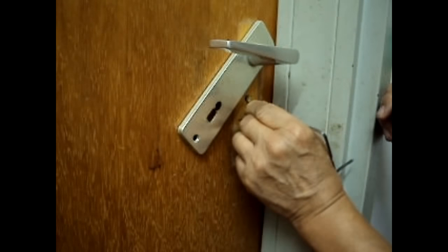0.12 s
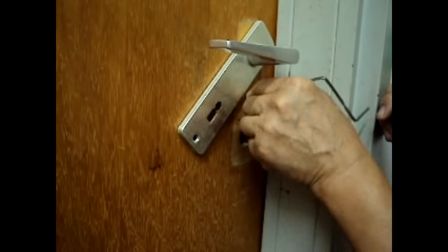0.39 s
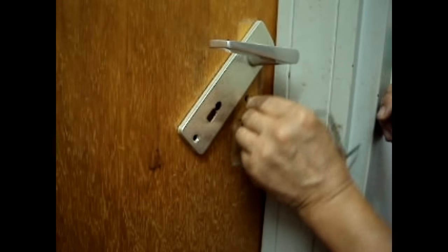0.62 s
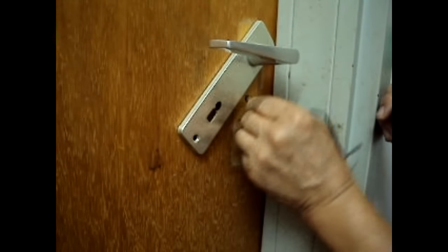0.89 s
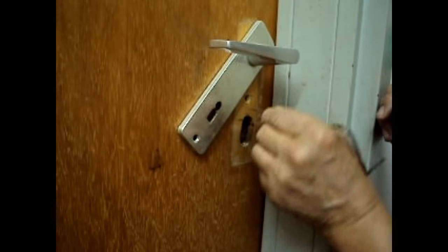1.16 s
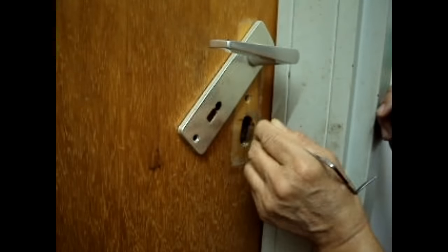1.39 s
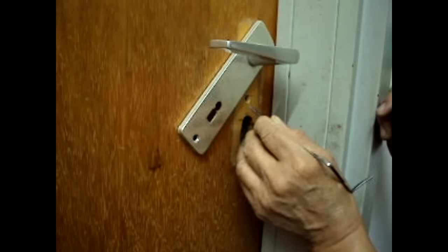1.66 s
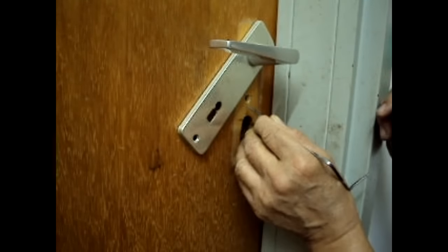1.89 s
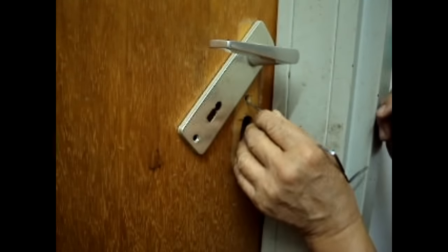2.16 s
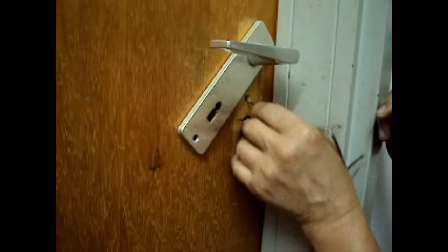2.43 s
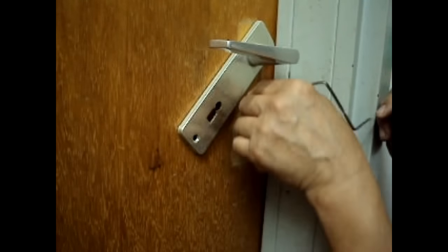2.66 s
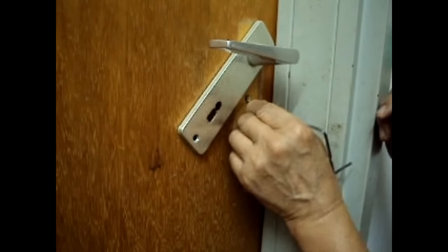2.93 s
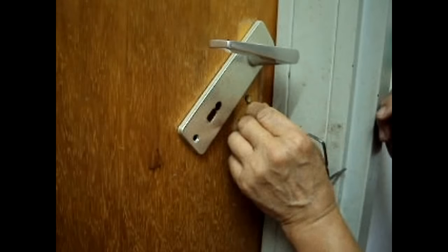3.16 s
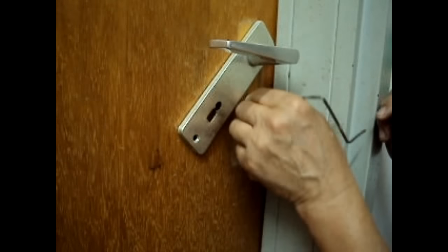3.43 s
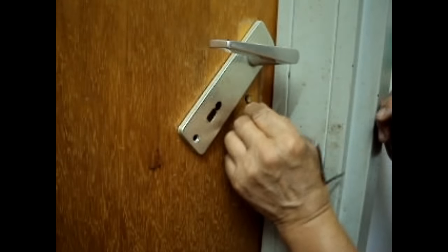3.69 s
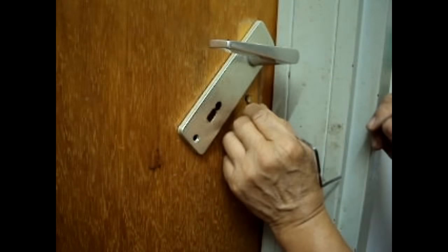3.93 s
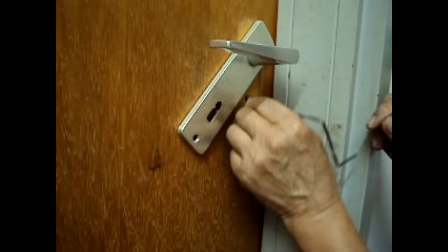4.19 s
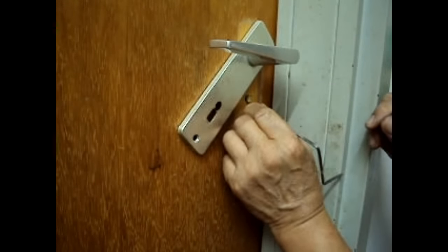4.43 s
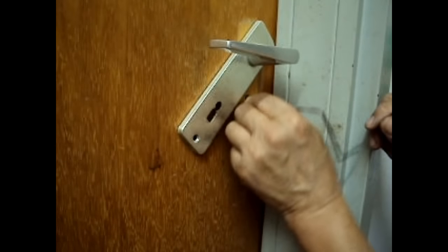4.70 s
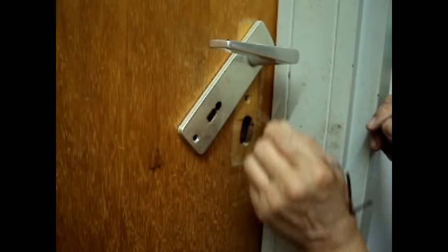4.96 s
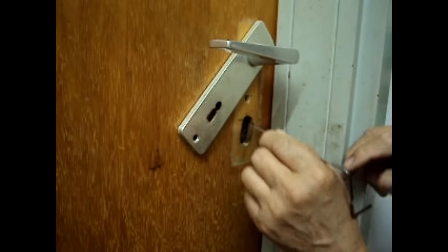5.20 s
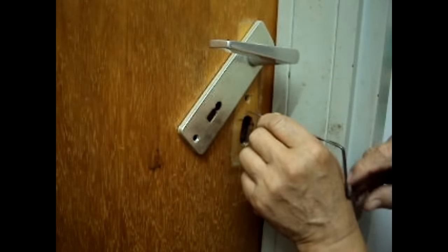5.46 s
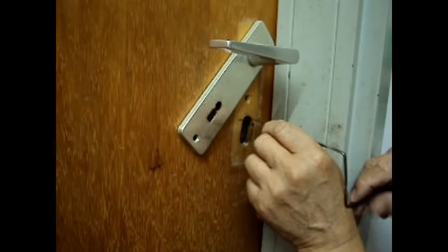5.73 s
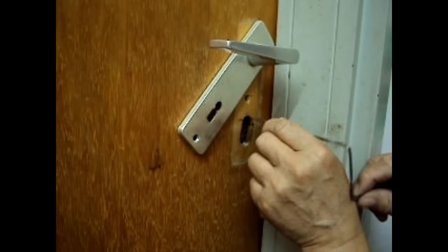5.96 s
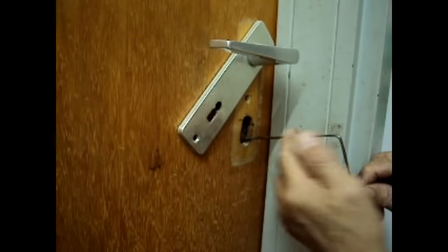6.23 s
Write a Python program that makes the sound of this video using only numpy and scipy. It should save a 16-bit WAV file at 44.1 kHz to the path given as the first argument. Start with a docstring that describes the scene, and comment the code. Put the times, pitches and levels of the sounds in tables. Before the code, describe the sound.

A small indoor room, heard closely through a crude microphone: low rumble and dull hiss with a coarse, grainy edge, and a metallic false brightness on every sound. At 0 s a deep, wavering boom and a soft door tap. From 0.5 to 0.9 s several light woody taps cluster, strongest about 0.65 s. At 1.15-1.2 s a quick, sharp metallic clatter hits the lock case, followed by a low thud. Then quiet, the background thinning, with one barely audible tick near 2.2 s. From 2.4 to 3.15 s the probe scrapes, strongest near 2.9 s, amid taps, low booms and a loose plate's rattle, which trails to 3.3 s. Faint isolated ticks at 3.6, 3.75, 4.25 and 4.75 s. At 5.04-5.08 s comes the loudest event, a rapid volley of hard snaps in metal and wood, with short room reverberation and a boom at 5.17 s. Fuller room noise continues alone to about 6.35 s.

```python
"""A thin steel probe works inside a hole in a wooden door, against a lock case, in a small room.
A low boom and a tap open; taps lead to a burst near 1.2 s, as impacts excite decaying modes and the room.
From 2.4 to 3.15 s a scrape excites the modes by dense slips, amid taps and rattles of a loose cover plate.
Sparse faint taps lead to hard snaps near 5.05 s and a boom of rumble and wavering hum; noise lies beneath all.
Slow, coarse sampling joined by straight lines mirrors the whole sound into the treble."""
import sys
import numpy as np
from scipy import signal
from scipy.fft import rfft, irfft, next_fast_len
from scipy.io import wavfile

SR = 44100
rng = np.random.default_rng(int(sys.argv[2]) if len(sys.argv) > 2 else 0)


def linear_from_db(decibels):
    """Turn decibels (scalar or array-like) into linear amplitude factors; 0 gives 1."""
    return 10 ** (np.asarray(decibels, float) / 20)


def to_wav(sig):
    """Store sig (one row per channel, or 1-D mono) as 16-bit WAV at the path in sys.argv[1].

    Samples outside -1..1 are clipped; the rate is SR.
    """
    pcm = np.clip(np.atleast_2d(sig), -1, 1) * 32767
    pcm = np.round(pcm).astype(np.int16)
    wavfile.write(sys.argv[1], SR, pcm.T)  # frames by channels


N = 280035
SAMPLE_STEP = 4  # the slow sampling keeps one sample in four

# Contacts of the probe in the bore: (time [s], lock case level [dB], panel level [dB],
# wood level [dB], steel tip level [dB])
BORE_CONTACTS = [(0.002, -57, -38, -49.5, -66.5), (0.51, -58.5, -43.5, -43, -91),
                 (0.583, -74, -43, -70.5, -85), (0.6, -48.5, -50, -50, -85), (0.636, -51.5, -41, -55, -73),
                 (0.647, -49, -35, -43.5, -64), (0.658, -46.5, -30, -43, -67.5),
                 (0.683, -63.5, -44.5, -48, -83), (0.81, -70, -47.5, -54, -88),
                 (0.893, -72, -48, -64.5, -85), (1.143, -55.5, -47, -55.5, -74),
                 (1.157, -47.5, -34.5, -66, -84), (1.17, -31.5, -31, -40, -53.5),
                 (1.182, -27, -36, -38.5, -47), (1.187, -32, -67, -53.5, -42),
                 (1.195, -43.5, -42.5, -38, -40.5), (2.166, -80, -52, -71.5, -83),
                 (2.694, -50, -44, -49.5, -63), (2.752, -57.5, -44, -50, -79),
                 (2.818, -63, -48, -54.5, -85), (2.881, -40.5, -48.5, -46.5, -60),
                 (2.89, -45, -41, -41, -73), (2.906, -37.5, -33, -41, -52.5), (2.917, -53, -33.5, -58, -69),
                 (3.055, -46, -51.5, -60, -59), (3.069, -55, -76, -46.5, -72),
                 (3.176, -66.5, -79.5, -51, -103), (3.605, -50.5, -55.5, -53.5, -71),
                 (3.753, -66, -46.5, -55.5, -69), (3.77, -57.5, -59, -53.5, -80.5),
                 (4.225, -58.5, -66, -73, -72), (4.234, -70.5, -63.5, -55, -77),
                 (4.291, -64, -78, -77, -68), (4.737, -60.5, -79, -60.5, -67.5),
                 (4.747, -56.5, -85, -62.5, -78.5), (4.854, -68, -56.5, -67.5, -93),
                 (5.009, -56, -49.5, -78, -72), (5.039, -35.5, -28.5, -32.5, -38),
                 (5.047, -21, -32.5, -23.5, -30.5), (5.056, -25, -28, -19.5, -22.5),
                 (5.064, -20, -28.5, -32.5, -31), (5.073, -25, -32, -24, -40.5),
                 (5.082, -29.5, -28.5, -21, -38.5)]
# Knocks of the probe on the loose plate: (time [s], plate level [dB])
PLATE_KNOCKS = [(2.752, -45.5), (3.055, -48), (3.237, -45.5), (3.249, -45), (3.261, -49), (3.283, -53)]


def taps():
    """Superposition: every contact adds its own direct sound and its own reverberation."""
    plate_under_case_db = 7  # the cover plate is screwed to the lock and rings along with it
    case_under_plate_db, wood_under_plate_db = 9.5, 10.5
    contacts = []
    for s, case, panel, wood, tip in BORE_CONTACTS:
        contacts.append((s, case, panel, wood, case - plate_under_case_db, tip))
    for s, plate in PLATE_KNOCKS:
        door = plate - wood_under_plate_db  # panel and wood alike
        contacts.append((s, plate - case_under_plate_db, door, door, plate, -np.inf))  # tip silent
    out = np.zeros(N + 2 * SR)
    for s, *levels in contacts:
        start = round(s * SR)
        near = strike(levels)
        far = reverb(near)
        out[start:start + len(near)] += near
        out[start:start + len(far)] += far
    return out[:N]


# Natural modes of each part: (frequency [Hz], relative level [dB], decay time t60 [s])
CASE_MODES = [(1057.6, 5, 0.045), (1115, -13.5, 0.042), (1192, 2, 0.042), (1275, -3, 0.055),
              (1384, 0.5, 0.017)]
PANEL_MODES = [(164.5, -5.5, 0.12), (215, -7, 0.23)]
WOOD_MODES = [(340.6, -5, 0.088), (391.8, -4.5, 0.085), (457, -6, 0.021), (540.5, 3.5, 0.042),
              (628.5, 3.5, 0.039), (723, -1.5, 0.046), (892, -4, 0.024)]
PLATE_MODES = [(837, 1.5, 0.027), (1596, -17, 0.041)]
STEEL_MODES = [(1550, 0, .006), (1950, -1, .008), (2400, -4, .005), (2800, -5, .006), (3200, -6, .009),
               (3600, -10, .005), (4200, -13, .004), (4600, -13, .005), (5000, -11, .006),
               (5350, -11, .006)]


def strike(levels):
    """Forced vibration: a blow and a brief chatter of the springy tip drive each part's modes."""
    settle_s = 0.002  # the tip presses home over a moment, so each blow swells in
    crack_db, crack_t60_s = 7.5, 0.012  # the tip's dry crack, over its ringing
    parts = (CASE_MODES, PANEL_MODES, WOOD_MODES, PLATE_MODES, STEEL_MODES)
    # Chatter against the blow, part by part
    chatter = (0.06, 0.059, 0.027, 0.15, 0.035)
    t = np.arange(SR // 30) / SR
    near = 0
    for db, modes, size in zip(levels, parts, chatter):
        force = size * np.exp(-t / 0.008) * rng.standard_normal(len(t))
        force[0] = 1  # the blow
        struck = signal.fftconvolve(ring(modes), force)
        struck = struck * (1 - np.exp(-np.arange(len(struck)) / SR / settle_s))
        near = near + linear_from_db(db) * struck / np.std(struck[:SR // 50])  # level over the first 20 ms
    crack = unit(np.diff(rng.standard_normal(len(t) + 1)))
    near[:len(t)] += linear_from_db(levels[-1] + crack_db - 60 * t / crack_t60_s) * crack
    return near


def ring(modes, rise_cycles=0.79):
    """Modal superposition: decaying sines at new strengths and phases, rms 1 over the first 20 ms."""
    scatter_db = 2  # each contact finds the modes at slightly new strengths
    t = np.arange(SR // 3) / SR
    hz, db, t60 = np.transpose(modes)[:, :, None]
    db = db + scatter_db * rng.standard_normal(db.shape)
    rise = 1 - np.exp(-t * hz / rise_cycles)  # a soft contact: each mode builds up over about a cycle
    phase = 2 * np.pi * rng.random(db.shape)
    decay = linear_from_db(db - 60 * t / t60)
    sound = np.sum(decay * np.sin(2 * np.pi * hz * t + phase) * rise, axis=0)
    return sound / np.std(sound[:SR // 50])


# Answer of the room: (frequency [Hz], decay time t60 [s], reverberant against direct energy [dB])
ROOM_ANSWER = [(147, 0.44, -13.5), (404.4, 0.47, -2.5), (1455, 0.36, -4.5), (3030, 0.36, -4.5),
               (5060, 0.26, -4)]


def reverb(x):
    """Diffuse decay: convolution with a new noise tail whose frequencies each die at their own speed."""
    hz, t, z = signal.stft(rng.standard_normal(SR * 6 // 10), SR, nperseg=256)
    t60 = along([(f, s) for f, s, db in ROOM_ANSWER], hz)[:, None]
    level_db = along([(f, db) for f, s, db in ROOM_ANSWER], hz)[:, None]
    level = linear_from_db(level_db) * np.sqrt(6 * np.log(10) / t60 / SR)  # allows for the energy of a longer decay
    tail = signal.istft(z * level * linear_from_db(-60 * t / t60), SR, nperseg=256)[1]
    delayed = np.pad(x, (SR // 200, 0))  # 5 ms
    return signal.fftconvolve(delayed, tail)


# Pressure of the probe dragged along the bore: (time [s], pressure [dB])
DRAG_PRESSURE = [(2.4, -78.5), (2.62, -56), (2.74, -60.5), (2.87, -43.5), (2.94, -47.5), (3.06, -65),
                 (3.15, -74)]
# Response of case, panel, wood and upper plate mode:
# (level above -50 dB at a pressure of -50 dB [dB], growth with pressure [dB per dB])
DRAG_RESPONSE = [(-0.5, 0.9), (-4.5, 2.7), (-4, 0.7), (-14.5, 0.35)]


def drag(slips_per_s=1200):
    """Stick-slip friction: dense tiny slips ring the parts, each growing with pressure at its own pace."""
    pressure_db, = curves(DRAG_PRESSURE)
    above = pressure_db + 50
    parts = (CASE_MODES, PANEL_MODES, WOOD_MODES, PLATE_MODES[1:])
    out = np.zeros(N)
    for (db, growth), modes in zip(DRAG_RESPONSE, parts):
        slips = (rng.random(N) < slips_per_s / SR) * rng.standard_normal(N)
        shaken = unit(signal.fftconvolve(slips, ring(modes))[:N])
        out += linear_from_db(-50 + db + growth * above) * shaken
    return out


# Level of the room tone: (time [s], level [dB])
TONE_LEVEL = [(0, -51), (1.5, -53.5), (2.3, -56), (4.9, -59), (5.2, -51), (6.35, -53.5)]
# Low booms, mostly just after a push on the door: (time of peak [s], hum level [dB], rumble level [dB])
DOOR_BOOMS = [(0.04, -38.5, -49.5), (0.66, -52.5, -57), (1.32, -48, -54), (2.27, -59.5, -66),
              (2.78, -53, -50), (3.0, -44.5, -48.5), (5.171, -45.5, -54.5)]


def background():
    """Amplitude modulation: hiss and rumble drift together; booms swell the rumble and a hum."""
    rise_s, fall_db_per_s = 0.036, 110.5
    under_tone_db, wobble_db = 8, 3.5  # the steady rumble
    tone_db, = curves(TONE_LEVEL)
    peak_s, hum_db, rumble_db = np.transpose(DOOR_BOOMS)[:, :, None]
    late = np.arange(N) / SR - peak_s
    rise = np.exp(-(late / rise_s) ** 2)
    fall = linear_from_db(-fall_db_per_s * np.abs(late))
    swell = np.where(late < 0, rise, fall)
    steady = linear_from_db(tone_db - under_tone_db + wobble_db * noise(lambda hz: hz < 4))
    rumble_level = steady + np.sum(linear_from_db(rumble_db) * swell, axis=0)
    hum_level = np.sum(linear_from_db(hum_db) * swell, axis=0)
    return linear_from_db(tone_db) * hiss() + rumble_level * rumble() + hum_level * hum()


# Spectrum of the room tone: (frequency [Hz], relative density [dB per Hz])
HISS_SPECTRUM = [(30, -14), (55, -4), (80, -0.5), (110, -6), (305, -11), (600, -16), (1000, -19.5),
                 (2000, -26.5), (5500, -32.5)]


def hiss():
    """Filtered noise: random pressure of rms 1, band-limited to half the slow sampling rate."""
    return noise(lambda hz: linear_from_db(along(HISS_SPECTRUM, hz)) * (hz < SR / SAMPLE_STEP / 2))


# Spectrum of the rumble: (frequency [Hz], relative density [dB per Hz])
RUMBLE_SPECTRUM = [(20, -22), (30, -3), (40, 6.5), (60, 7), (100, -19.5), (140, -48)]


def rumble():
    """Filtered noise: random pressure of rms 1 gathered in the deep bass."""
    return noise(lambda hz: linear_from_db(along(RUMBLE_SPECTRUM, hz)))


def hum():
    """Frequency modulation: a sine of rms 1 near 81 Hz wavers by 1.9 Hz rms, slower than 8 Hz."""
    waver_hz = 1.9 * noise(lambda hz: hz < 8)
    return np.sqrt(2) * np.sin(2 * np.pi * np.cumsum(81 + waver_hz) / SR)


def noise(gain):
    """Spectral shaping: white noise coloured by a gain of frequency, rms 1."""
    m = next_fast_len(N)
    spectrum = rfft(rng.standard_normal(m)) * gain(np.fft.rfftfreq(m, 1 / SR))
    return unit(irfft(spectrum, m)[:N])


def unit(x):
    """Normalisation by mean power: scaled to rms 1."""
    return x / np.sqrt(np.mean(x ** 2) + 1e-20)


def along(points, hz):
    """Logarithmic frequency scale: interpolates (frequency [Hz], value) points."""
    f, v = np.transpose(points)
    return np.interp(np.log(hz + 1), np.log(f + 1), v)


def curves(rows):
    """Linear interpolation in dB: one curve per column after the time; -120 dB outside the table."""
    s, *cols = np.transpose(rows)
    return [np.interp(np.arange(N) / SR, s, c, left=-120, right=-120) for c in cols]


def scene():
    """Radiation: the door is too small for deep bass; probe and background meet at one microphone."""
    radiation = signal.butter(4, 140, "high", fs=SR, output="sos")
    door = signal.sosfilt(radiation, taps() + drag())
    return (door + background())[None]


def band_limit(x):
    """A steep low-pass at the top of the band."""
    return signal.sosfilt(signal.butter(12, 15750, fs=SR, output="sos"), x)


def record(dry):
    """Aliasing and quantisation: slow samples in coarse steps, joined by lines, mirror the spectrum."""
    level_step = 1 / 535  # the smallest stored change, full scale being 1
    offset_steps = 1.03
    whole = np.arange(N)
    stored = level_step * np.round(dry[0, 2::SAMPLE_STEP] / level_step + offset_steps)
    joined = np.interp(whole, whole[2::SAMPLE_STEP], stored)
    return band_limit(joined[None])


dry = scene()
out = record(dry)
to_wav(out)
```